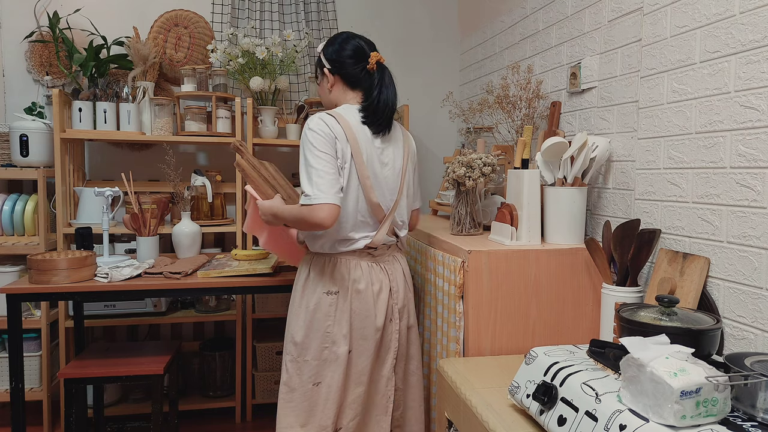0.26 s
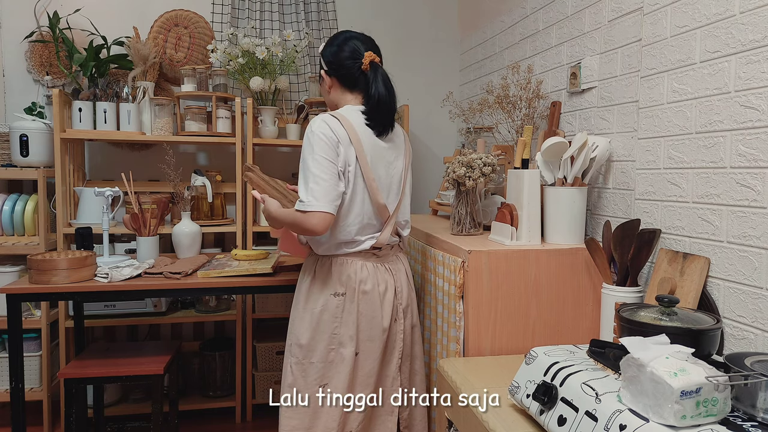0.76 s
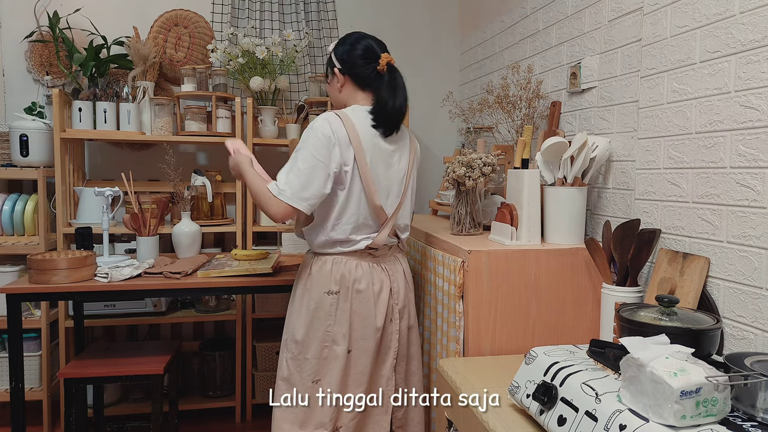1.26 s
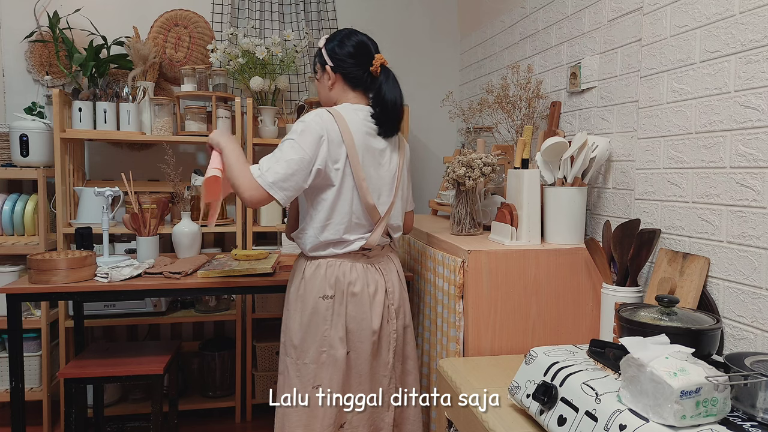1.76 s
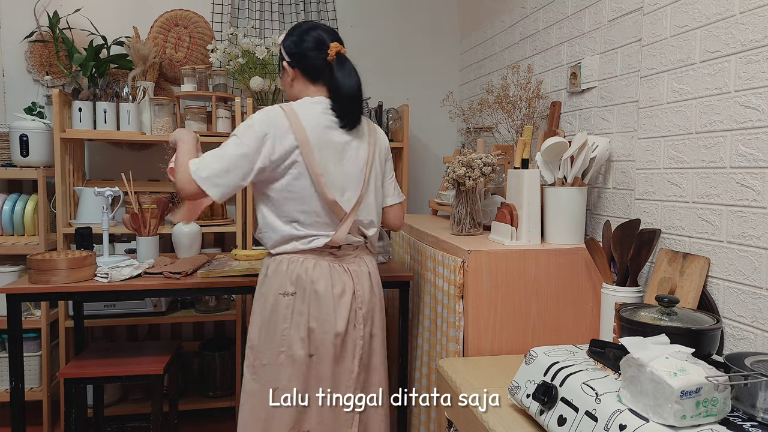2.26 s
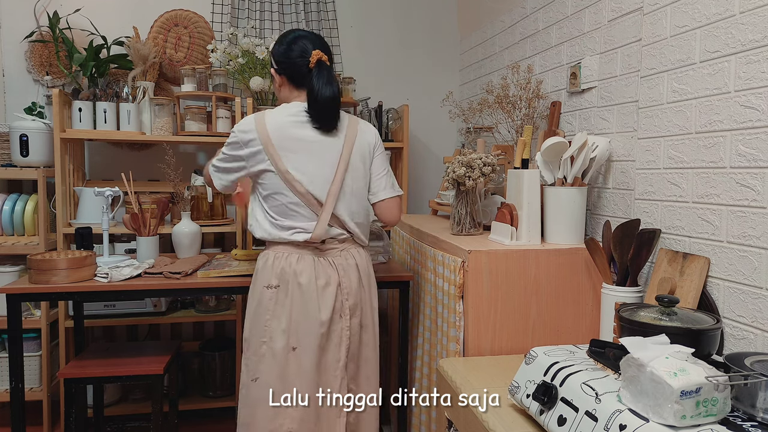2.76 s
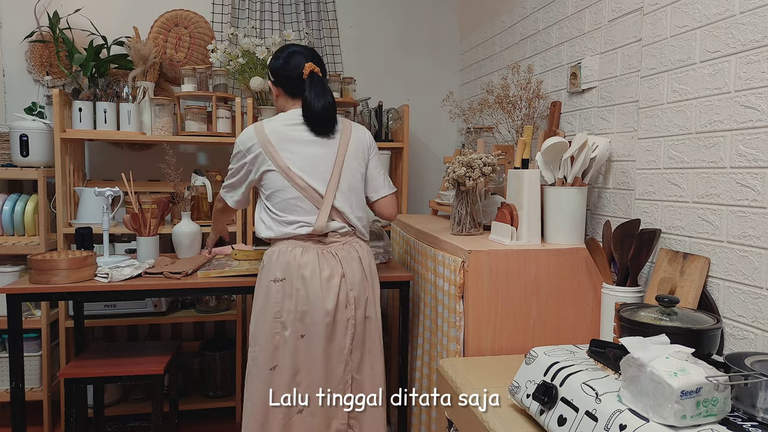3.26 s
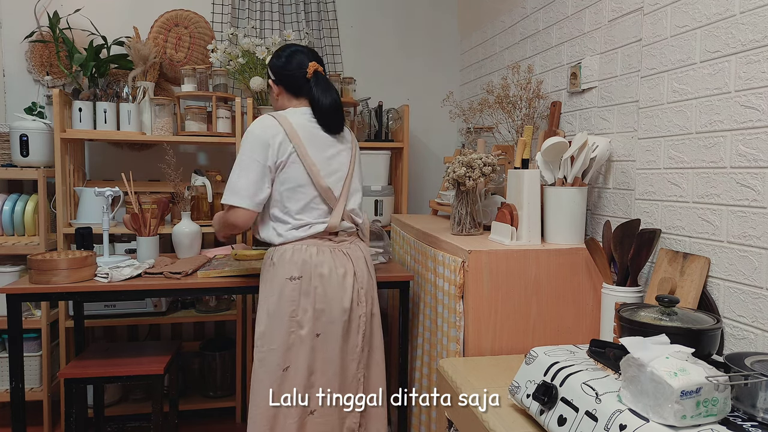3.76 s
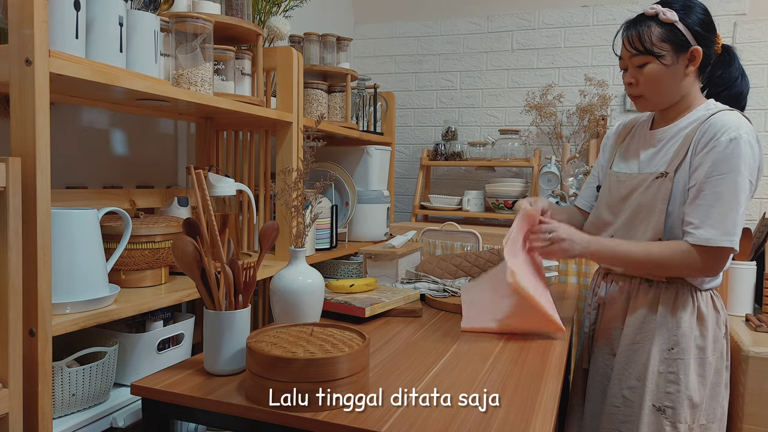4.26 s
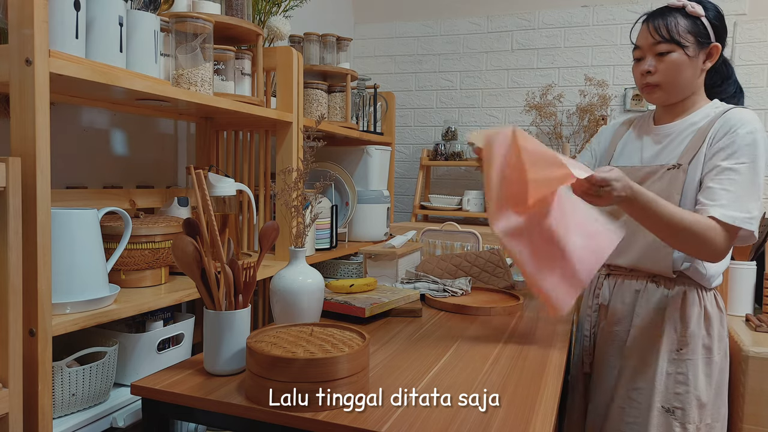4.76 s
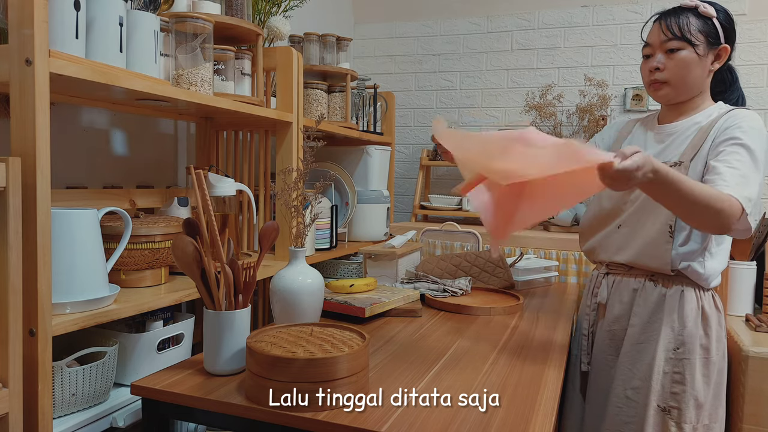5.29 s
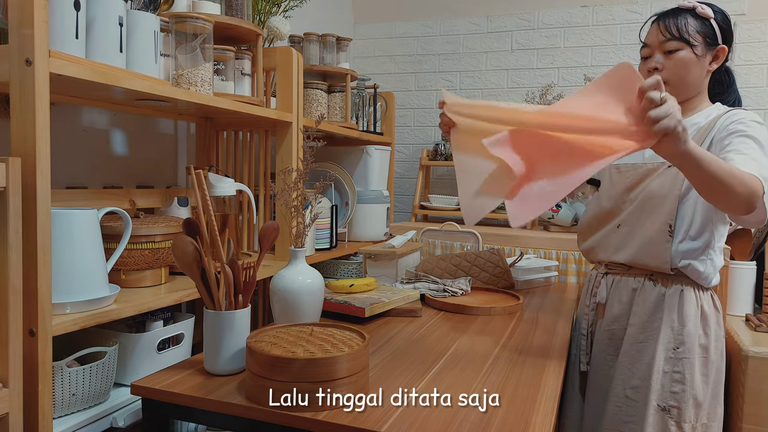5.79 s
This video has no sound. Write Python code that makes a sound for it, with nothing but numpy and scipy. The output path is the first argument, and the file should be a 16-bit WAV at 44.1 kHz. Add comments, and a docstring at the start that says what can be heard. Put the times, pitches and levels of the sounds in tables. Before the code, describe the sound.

Wooden trays knock softly in the hands, clatter onto a table, then a thin crisp sheet is shaken open with loud rustling and snapping folds.

```python
"""Wooden trays knock together in the hands in a quiet kitchen, then land on a table and rock to rest.
A thin, crisp sheet rustles loudly as it is slid open and shaken out, its folds snapping taut in turn.
Tray knocks are decaying modes; the sheet is coloured grains, pulses and ticks; a low hum of three
lines swells for a moment before the landing. Faint room hiss lies under it all; one microphone."""
import sys
import numpy as np
from scipy import signal
from scipy.fft import rfft, irfft, next_fast_len
from scipy.io import wavfile

SR = 44100
rng = np.random.default_rng(int(sys.argv[2]) if len(sys.argv) > 2 else 0)


def int16_out(signal):
    """Quantize to a 16-bit WAV file."""
    q = np.round(np.clip(np.atleast_2d(signal).T, -1, 1) * 32767)
    wavfile.write(sys.argv[1], SR, q.astype(np.int16))


N = 265923
TIME = np.arange(N) / SR

# Stroke tables start with start_s, attack_s, hold_s, release_s: build up until start_s, hold, die away.
# Attack and release are the times for 20 dB. Levels are those before layer trims and room.

# hands moving the sheet: start_s, attack_s, hold_s, release_s, rub_db, sizzle_db, silk_db
MOVES = [(2.185, 0.034, .012, 0.21, -63, -75, -68), (2.31, 0.026, 0.038, .08, -58.5, -58.5, -62),
         (3.627, 0.018, .006, 0.052, -73, -64, -45), (3.705, .06, 0.0091, .07, -75, -78, -54),
         (4.195, 0.048, 0.013, 0.043, -68, -69.5, -60), (4.52, .07, .03, 0.06, -62, -59, -52),
         (4.612, 0.045, 0.053, 0.18, -30.5, -24.5, -28.5), (4.71, 0.066, 0.13, 0.11, -22, -19, -25),
         (4.99, 0.052, .09, 0.05, -46.5, -69, -48.5), (5.125, 0.061, 0.08, .2, -34.5, -34, -39),
         (5.24, 0.047, 0.038, .1, -34, -45, -54), (5.42, 0.29, 0.046, 0.22, -23.5, -22.5, -28),
         (5.635, 0.017, 0.0099, 0.046, -30.5, -57, -43), (5.765, 0.32, 0.026, 0.05, -34.5, -43, -29.5),
         (5.92, 0.24, 0.062, 0.13, -70, -44.5, -34.5)]
# sheet catching the air and fluttering: start_s, attack_s, hold_s, release_s, level_db
BILLOWS = [(4.695, 0.12, 0.009, 0.087, -45), (4.826, 0.073, 0.048, 0.086, -25.5),
           (5.24, 0.044, .01, 0.068, -31), (5.44, 0.22, 0.038, 0.32, -22.5),
           (5.762, 0.15, 0.0077, 0.076, -22)]
# deep puffs of air pushed by the sheet: start_s, attack_s, hold_s, release_s, air_db, wide_folds_db
PUFFS = [(4.695, 0.018, 0.0093, 0.024, -62, -40), (4.848, 0.017, 0.019, 0.057, -38, -32.5),
         (4.925, 0.016, 0.0093, 0.015, -39, -46), (5.40, 0.035, .05, 0.17, -65, -34.5),
         (5.82, 0.027, 0.019, 0.026, -44.5, -43)]
# folds snapping taut: start_s, pop_db, pop_hz, crack_db, crack_hz
SNAPS = [(5.2175, -23.5, 830, -7, 2710), (5.2187, -28.5, 780, -11.5, 3550), (5.227, -22, 800, -23, 3070),
         (5.433, -10.5, 685, -3.5, 2540), (5.434, -10, 1400, -14.5, 4340), (5.5545, -5, 695, -19.5, 2400),
         (5.564, -13, 670, -39, 2480), (5.578, -9.5, 824, -40, 2480), (5.632, -7.5, 767, -35, 2980),
         (5.687, -22, 860, -34, 2390), (5.710, -10, 800, -27, 3350), (5.7303, -11, 1250, -30, 2890),
         (5.733, -5.5, 804, -21, 2370), (5.7545, -20, 740, -24.5, 3370), (5.7705, -18.5, 445, -20, 2860),
         (5.804, -17.5, 405, -46, 2500)]
# single creases buckling: start_s, level_db, pitch_hz
CREASES = [(.171, -49, 3500), (2.073, -39, 1090), (2.098, -44, 1080), (2.137, -43, 1290),
           (2.139, -46.5, 4030), (2.179, -35.5, 920), (2.192, -42, 5800), (2.416, -46, 1030),
           (2.54, -50.5, 3080), (4.163, -39, 1280), (4.205, -40, 2320), (4.744, -13, 6100),
           (4.755, -14, 7150), (4.893, -18.5, 5270), (5.022, -30, 1260), (5.435, -7.5, 7600),
           (5.555, -15.5, 5940), (5.635, -21.5, 6360)]
# hollow of the billowed sheet: pitch_hz, width_hz, level_db
SHEET_HOLLOW = (780, 45, -0.079)
# relative spectra of coarse rubbing, fibre sizzle, silky hiss and flapping folds: pitch_hz, level_db (per Hz)
RUB_SPECTRUM = [(700, -10), (1000, 0), (1400, 1.5), (1900, -5), (2500, 5), (3060, 5), (3900, 1.5),
                (5200, 0), (6700, 0.5), (7600, -21), (9000, -16.5), (11000, -35)]
SIZZLE_SPECTRUM = [(5500, -52), (7000, -3.5), (7800, -2.5), (8800, -2), (10500, -4), (11700, -3.5),
                   (12400, -2), (14000, -26)]
SILK_SPECTRUM = [(8000, -37), (11000, -4), (12200, -4.5), (13800, 1.5), (15000, -5), (15800, -2)]
FLAP_SPECTRUM = [(30, -48), (70, -35), (160, -39), (300, 1.5), (480, -0.5), (780, 7), (1100, 4),
                 (1500, 1.5), (2200, -7.5), (4000, -46)]

# wooden trays knocking: start_s, ring_db, contact_cutoff_hz, crack_db, ring_share (of t60, left by the grip)
KNOCKS = [(0.001, -24, 430, -57, 0.8), (0.024, -20, 420, -26.5, .45), (0.0495, -21, 560, -41, 0.68),
          (0.172, -41, 450, -72, 0.59), (0.229, -45, 500, -73, 0.56), (3.146, -16.5, 900, -28, 0.97),
          (3.153, -4.5, 900, -15.5, 1), (3.207, -14, 905, -18.5, 1), (3.31, -19.5, 1120, -34, 0.79),
          (3.352, -28, 1500, -33.5, 0.46), (3.3738, -32, 2200, -23, 0.66), (3.411, -23, 1200, -38, 0.44)]
# tray rocking to rest on its rim: start_s, ring_db
ROCKS = [(3.505, -35.5), (3.604, -34), (3.693, -43), (3.785, -42), (3.863, -49.5)]
# modes of a tray on the table: pitch_hz, level_db, t60_s
TRAY_MODES = [(167, -41, 0.14), (238, -23, 0.16), (305, -20.5, 0.17), (379.2, -13.5, 0.17),
              (442.5, -13, 0.3), (483.2, -12, 0.21), (511, -5, 0.13), (588, -7, 0.17), (634.5, -2, 0.073),
              (657, -15.5, 0.44), (725, -17.5, 0.32), (759, -7, 0.21), (817, -11.5, 0.21), (851, -5.5, 0.1),
              (1010, -22.5, 0.21), (1163, -21, 0.24), (1310, -17.5, .22), (1410, -23, 0.1)]
# trays skidding as they land: start_s, attack_s, hold_s, release_s, level_db
SKIDS = [(3.163, .012, 0.0046, 0.029, -15.5), (3.175, 0.017, 0.072, 0.054, -30),
         (3.385, 0.013, 0.014, 0.073, -46.5)]
# relative spectra of the knock's crack and the skid's grit: pitch_hz, level_db (per Hz)
CRACK_SPECTRUM = [(100, -18), (300, 8), (900, 13), (1400, 0), (2000, 0), (3300, -1.5), (5000, -8),
                  (8500, -35), (11000, -49), (16000, -38.5)]
GRIT_SPECTRUM = [(880, -48.5), (1500, -8.5), (1750, -14.5), (2500, -11.5), (3070, -15.5), (4110, -8),
                 (5470, -13), (7260, -7), (9370, -13), (14600, -10), (15600, -19)]

# folded sheet sliding against the wood: start_s, attack_s, hold_s, release_s, level_db
SLIDES = [(.425, 0.051, .008, 0.18, -60), (.576, 0.032, 0.031, 0.026, -46), (.695, 0.1, 0.047, 0.11, -45),
          (1.065, .06, .008, .12, -60.5)]
# resonances of the sheet sliding on wood: pitch_hz, width_hz, level_db
SLIDE_MODES = [(1032, 100, -1), (1430, 290, -6), (3210, 220, 7.5), (3480, 360, 2.5), (4180, 460, 3.5),
               (4600, 550, 2), (6000, 2800, -6.5), (10500, 4000, -5), (13900, 1500, 0.5)]
# thin squeaks of surfaces rubbing: centre_s, length_s, pitch_hz, level_db
SQUEAKS = [(.58, 0.023, 3520, -49), (.59, .037, 5130, -51.5), (.72, .07, 1008, -55.5),
           (.75, 0.078, 1466, -52.5), (.94, 0.05, 788, -56), (1.15, .11, 840, -59), (1.25, 0.077, 998, -56),
           (2.505, .039, 10900, -58.5), (3.985, 0.071, 3040, -57), (4.73, .12, 3130, -33),
           (5.47, 0.11, 11700, -34), (5.93, 0.083, 1370, -49)]
# dull bumps and scuffs of things being handled: centre_s, length_s, pitch_hz, level_db
THUDS = [(.03, .011, 4400, -39), (.033, 0.015, 293, -26), (.222, 0.055, 182, -49), (.97, 0.12, 156, -52),
         (2.11, 0.059, 121, -51), (2.13, 0.068, 990, -50.5), (3.185, 0.038, 1000, -27),
         (3.19, 0.049, 162, -36), (3.235, 0.063, 70.6, -38), (3.405, 0.037, 1410, -33),
         (4.2, 0.046, 787, -48.5), (4.21, .03, 2330, -51.5), (4.83, 0.027, 462, -27.5),
         (5.775, .035, 338, -31.5), (5.93, .11, 2520, -51.5)]

# swells of the low hum: start_s, attack_s, hold_s, release_s, main_line_db, upper_line_db
HUM_SWELLS = [(.85, 0.076, 0.0055, 0.1, -49.5, -62), (.975, 0.065, 0.029, 0.27, -53.5, -52),
              (1.37, 0.14, .11, .1, -41.5, -46), (1.75, 0.076, 0.021, 0.12, -41, -54)]
# lower, main and upper hum line: pitch_hz
HUM_LINES = (151, 201.5, 253)
# relative spectrum of the room's air: pitch_hz, level_db (per Hz)
AIR_SPECTRUM = [(15, -55), (25, -3.5), (119, -6), (140, -3), (314, -3.5), (510, -8), (553, -5.5), (600, -6),
                (724, -6.5), (1060, -10.5), (1140, -9), (1270, -12.5), (3550, -21.5), (11300, -23.5),
                (15600, -31)]
# decay of the kitchen: pitch_hz, t60_s
ROOM_DECAY = [(100, 0.34), (600, 0.22), (3000, 0.24), (8000, 0.12), (16000, 0.31)]
# near surfaces (counter, shelves, wall): delay_s, level_db
REFLECTIONS = [(.0035, -24), (.0098, -23), (.0235, -21.5)]

PUSH_HZ, PUSH_WIDTH_HZ = 62, 86   # the pushed air
FOLD_HZ, FOLD_WIDTH_HZ = 223, 224   # the widest folds flap lowest
# rocking makes soft contacts; the crack is relative to the ring
ROCK_CONTACT_HZ, ROCK_CRACK_DB, ROCK_RING_SHARE = 740, -30, 0.91
ATTACK_CURVE, RELEASE_CURVE = 1.09, 0.98   # 1 = even in dB, more = rounder
AIR_DB = -58.5
MIC_LOW_CUT_HZ, TOP_CUT_HZ = 59, 15750


def rustle():
    """Layers of the sheet slide over each other: coarse rubbing, a sizzle of fibres and a silky hiss."""
    rub = grains(RUB_SPECTRUM, per_s=1800, spread_db=4.0, smooth_share=0.85, clump_db=1.63, clump_rate=110)
    sizzle = grains(SIZZLE_SPECTRUM, per_s=5300, spread_db=3.0, smooth_share=0.6, clump_db=0.6, clump_rate=110)
    silk = grains(SILK_SPECTRUM, per_s=3800, spread_db=-3.0, smooth_share=0.81, clump_db=2.0, clump_rate=110)
    return (from_db(-2.5) * rub * strokes(MOVES, axis=4)
            + from_db(-5.5) * sizzle * strokes(MOVES, axis=5)
            + from_db(-3.0) * silk * strokes(MOVES, axis=6))


def flutter():
    """Loose folds flap in quick soft pulses; the widest flap lowest, and the sheet pushes deep puffs of air."""
    flaps = grains(FLAP_SPECTRUM, per_s=540, spread_db=0.5, smooth_share=0.99, clump_db=2.7, clump_rate=78)
    pushed_air = band_noise(PUSH_HZ, PUSH_WIDTH_HZ, N)
    wide_folds = band_noise(FOLD_HZ, FOLD_WIDTH_HZ, N)
    return (strokes(BILLOWS) * flaps
            + strokes(PUFFS, axis=4) * pushed_air
            + strokes(PUFFS, axis=5) * wide_folds)


def snaps(pop_cycles=1.46, crack_cycles=3.14, edge_db=-19):
    """A fold pulled taut gives a hollow pop, and its whipping edge a sharp, slightly noisy crack."""
    out = np.zeros(N)
    for start, pop_db, pop_hz, crack_db, crack_hz in SNAPS:
        crack = pop(crack_hz, crack_cycles)
        crack_envelope = np.abs(signal.hilbert(crack))
        spray = from_db(edge_db) * crack_envelope * rng.standard_normal(len(crack))
        hollow_pop = from_db(pop_db) * pop(pop_hz, pop_cycles)
        add(out, start, hollow_pop + from_db(crack_db) * (crack + spray))
    return out


def pop(hz, cycles):
    """A pressure pulse whose envelope peaks at 1 after the given number of cycles, then dies."""
    t = TIME[:SR // 40]
    age = t * hz / cycles
    envelope = (age * np.exp(1 - age)) ** 4
    return envelope * np.sin(2 * np.pi * hz * t)


def hollow(x):
    """The billowed sheet rings briefly after each snap."""
    hz, width_hz, db = SHEET_HOLLOW
    return x + from_db(db) * resonate(x, hz, width_hz)


def creases(t60=0.0095, relative_width=0.27):
    """Each buckling crease is a brief, broadly pitched tick: a dying noise burst in one resonance."""
    out, t = np.zeros(N), TIME[:SR // 10]
    for start, db, hz in CREASES:
        burst = rng.standard_normal(len(t)) * from_db(-60 * t / t60)
        tick = resonate(burst, hz, relative_width * hz)
        add(out, start, from_db(db) * tick / np.abs(tick).max())
    return out


def trays(crack_t60=0.073, scatter_db=-0.5, rise_s=0.0019):
    """Knocks ring the tray's modes, duller for soft contacts, shorter under the grip; skids rasp as grit."""
    rings, cracks, t = np.zeros(N), np.zeros(N), TIME[:SR // 2]
    hz, mode_db, t60 = np.array(TRAY_MODES).T[:, :, None]
    rocking = [(start, db, ROCK_CONTACT_HZ, db + ROCK_CRACK_DB, ROCK_RING_SHARE) for start, db in ROCKS]
    for start, ring_db, contact_hz, crack_db, ring_share in KNOCKS + rocking:
        scattered_db = mode_db + scatter_db * rng.standard_normal(hz.shape)
        strength = from_db(scattered_db) / np.hypot(1, (hz / contact_hz) ** 2)
        phase = rng.uniform(0, 2 * np.pi, hz.shape)
        decay = from_db(-60 * t / (ring_share * t60))
        ring = np.sum(strength * decay * np.sin(2 * np.pi * hz * t + phase), axis=0)
        add(rings, start, from_db(ring_db) * ring * (1 - np.exp(-t / rise_s)))
        crack = colour(rng.standard_normal(len(t)), CRACK_SPECTRUM)
        add(cracks, start, from_db(crack_db - 60 * t / crack_t60) * crack)
    grit = grains(GRIT_SPECTRUM, per_s=2000, spread_db=3.5, smooth_share=0.31, clump_db=0.0, clump_rate=250)
    skid = strokes(SKIDS) * grit
    return rings + kitchen(cracks, wet_db=-3) + kitchen(skid, wet_db=-8)


def slide():
    """Light friction on wood sings in narrow bands, with thin squeaks of rubbing surfaces."""
    friction = rng.standard_normal(N)
    bands = np.zeros(N)
    for hz, width_hz, db in SLIDE_MODES:
        bands += from_db(db) * resonate(resonate(friction, hz, width_hz), hz, width_hz)
    return strokes(SLIDES) * rms_one(bands) + swells(SQUEAKS, relative_width=0.08)


def thuds():
    """Handled things bump and scuff dully: short swells of broad noise bands."""
    return swells(THUDS, relative_width=0.57)


def hum(waver_db=2.5, lower_db=-16, rumble_db=-16, rumble_hz=200, rumble_width_hz=330):
    """Three low lines swell over a soft rumble, each wavering a little in level and phase."""
    lines = []
    for hz in HUM_LINES:
        level = np.sqrt(2) * from_db(waver_db * drift(16.9))
        cycles = hz * TIME + rng.random() + 0.07 * drift(10.4)
        lines.append(level * np.sin(2 * np.pi * cycles))
    lower, main, upper = lines
    rumble = from_db(rumble_db) * band_noise(rumble_hz, rumble_width_hz, N)
    body = main + from_db(lower_db) * lower + rumble
    return strokes(HUM_SWELLS, axis=4) * body + strokes(HUM_SWELLS, axis=5) * upper


def room_air():
    """The still air of the room is a faint, steady coloured noise."""
    return from_db(AIR_DB) * colour(rng.standard_normal(N), AIR_SPECTRUM)


def kitchen(x, wet_db):
    """Direct sound plus a diffuse noise tail whose bands decay at their own rates."""
    t, tail = TIME[:SR // 2], 0
    edges = np.geomspace(50, 18000, 9)
    for low, high in zip(edges, edges[1:]):
        band_pass = signal.butter(2, [low, high], "band", fs=SR, output="sos")
        band = signal.sosfilt(band_pass, rng.standard_normal(len(t)))
        tail = tail + band * from_db(-60 * t / at_hz(ROOM_DECAY, np.sqrt(low * high)))
    tail = tail * (1 - np.exp(-t / 0.0013))   # soft onset
    return x + from_db(wet_db) * signal.fftconvolve(x, tail / np.linalg.norm(tail))[:N]


def reflected(x):
    """Near surfaces repeat a sharp sound within a few hundredths of a second."""
    out = x.copy()
    for delay, db in REFLECTIONS:
        add(out, delay, from_db(db) * x)
    return out


def strokes(rows, axis=4):
    """Gain over time of strokes, at the level in column axis; overlaps add in power."""
    power = np.zeros(N)
    for row in rows:
        start, attack, hold, release = row[:4]
        early = np.maximum(start - TIME, 0) / attack
        late = np.maximum(TIME - start - hold, 0) / release
        near = early + late < 5   # beyond this the stroke is left silent
        fall_db = 20 * (early[near] ** ATTACK_CURVE + late[near] ** RELEASE_CURVE)
        power[near] += from_db(row[axis] - fall_db) ** 2
    return np.sqrt(power)


def swells(rows, relative_width):
    """Each row is a band of noise that swells and fades as a bell around its centre time."""
    out = np.zeros(N)
    for centre, length, hz, db in rows:
        near = np.abs(TIME - centre) < 2 * length
        bell = np.exp(-2 * ((TIME[near] - centre) / length) ** 2)
        sound = bell * band_noise(hz, relative_width * hz, len(bell))
        # give the noise the energy of its bell
        out[near] += from_db(db) * sound * np.linalg.norm(bell) / np.linalg.norm(sound)
    return out


def grains(spectrum, per_s, spread_db, smooth_share, clump_db, clump_rate):
    """Tiny slips of uneven size over a smooth noise bed, clumped by a drifting level; rms 1."""
    born = rng.random(N) < per_s / SR
    size = from_db(spread_db * np.minimum(rng.exponential(1, N), 4))
    slips = born * rng.choice([-1, 1], N) * size
    mix = rms_one(slips) + smooth_share * rng.standard_normal(N)
    return colour(mix * from_db(clump_db * drift(clump_rate)), spectrum)


def band_noise(hz, width_hz, size):
    """Noise passed twice through one resonance, its run-in dropped; rms 1."""
    noise = rng.standard_normal(size + SR // 4)
    return rms_one(resonate(resonate(noise, hz, width_hz), hz, width_hz)[SR // 4:])


def resonate(x, hz, width_hz):
    """A two-pole resonance with gain about 1 at its peak."""
    r = np.exp(-np.pi * width_hz / SR)
    zeros = np.array([1, 0, -1]) * (1 - r * r) / 2
    poles = [1, -2 * r * np.cos(2 * np.pi * hz / SR), r * r]
    return signal.lfilter(zeros, poles, x)


def colour(x, spectrum):
    """Shape a signal by a spectrum table; rms 1."""
    size = next_fast_len(len(x))
    gain = from_db(at_hz(spectrum, np.fft.rfftfreq(size, 1 / SR)))
    return rms_one(irfft(rfft(x, size) * gain, size)[:len(x)])


def drift(rate):
    """Slow chance: random points of spread 1, rate of them per second, joined by straight lines."""
    knots = rng.standard_normal(2000)
    return np.interp(TIME * rate, np.arange(len(knots)), knots)


def at_hz(points, hz):
    """Read a table on a log-frequency axis."""
    points = np.array(points)
    return np.interp(np.log(np.maximum(hz, 1)), np.log(points[:, 0]), points[:, 1])


def add(track, start, sound):
    """Mix a sound in at a time in seconds."""
    at = max(0, round(start * SR))
    track[at:at + len(sound)] += sound[:max(0, N - at)]


def from_db(db):
    """Decibels to gain."""
    return 10 ** (np.asarray(db) / 20)


def rms_one(x):
    """Scale to rms 1."""
    return x / np.sqrt(np.mean(x ** 2) + 1e-20)


def scene():
    """Sheet, trays and hum in the kitchen's still air, each sheet layer with its own share of room."""
    moving_sheet = kitchen(rustle() + flutter(), wet_db=-13.5)
    snapping_folds = kitchen(hollow(reflected(snaps())), wet_db=-8.0)
    ticking_creases = kitchen(creases(), wet_db=1.5)
    sheet = moving_sheet + snapping_folds + ticking_creases
    return (sheet + trays() + slide() + thuds() + hum() + room_air())[None]


def record(dry):
    """The microphone sheds the deepest bass, peaks stop at full scale and the top is cut."""
    low_cut = signal.butter(2, MIC_LOW_CUT_HZ, "high", fs=SR, output="sos")
    top_cut = signal.ellip(12, .1, 70, TOP_CUT_HZ, fs=SR, output="sos")
    heard = signal.sosfilt(low_cut, dry)
    return signal.sosfilt(top_cut, np.clip(heard, -1, 1))


dry = scene()
out = record(dry)
int16_out(out)
```